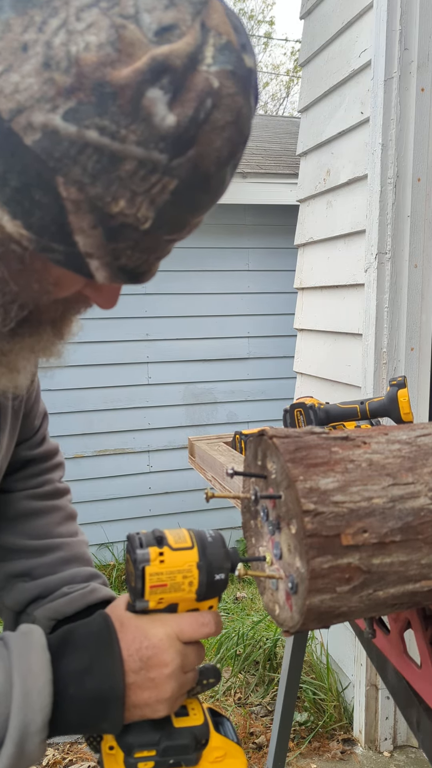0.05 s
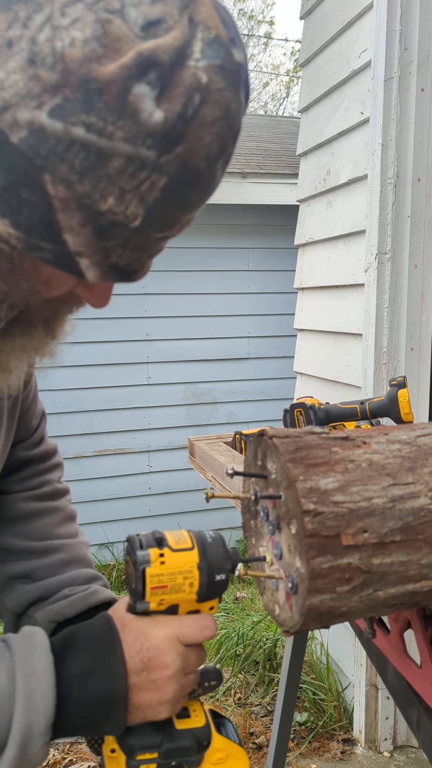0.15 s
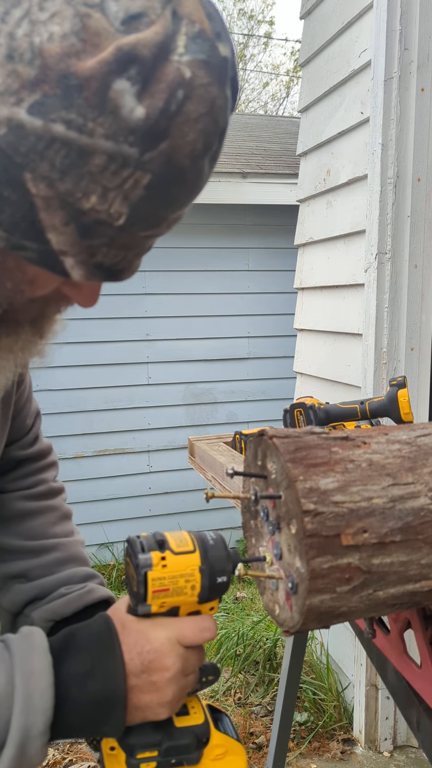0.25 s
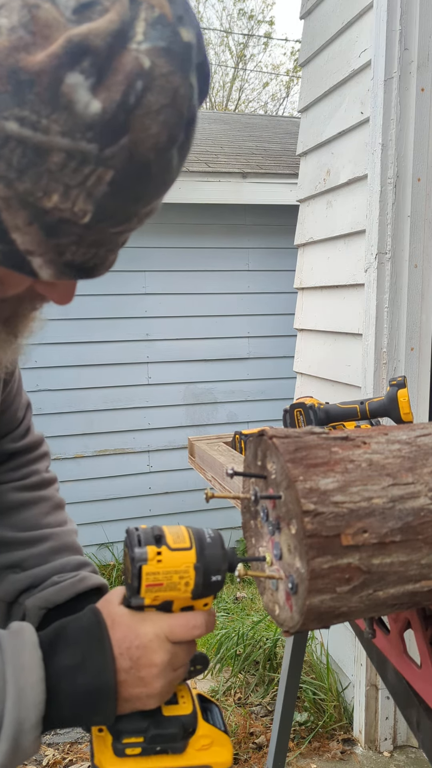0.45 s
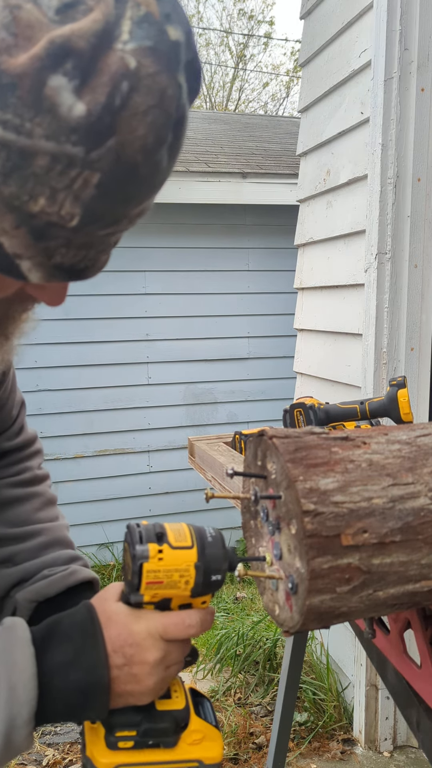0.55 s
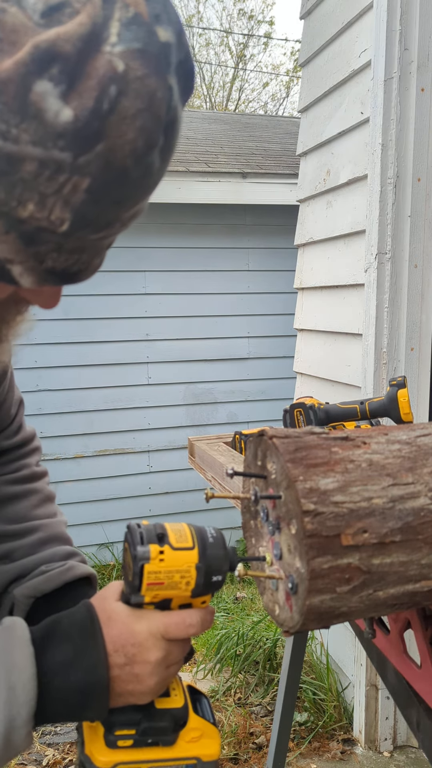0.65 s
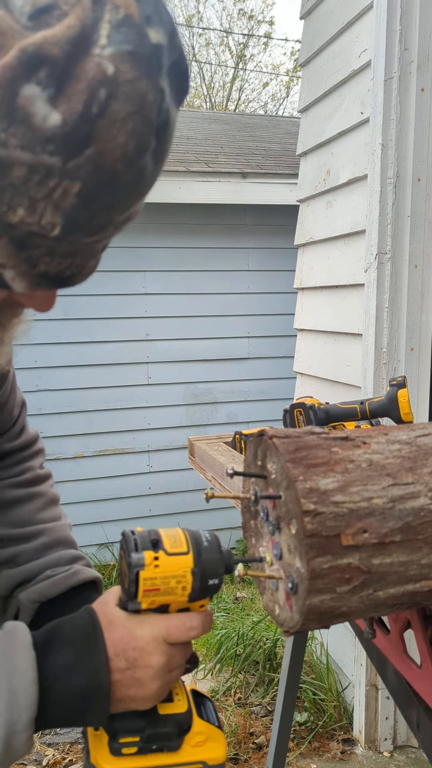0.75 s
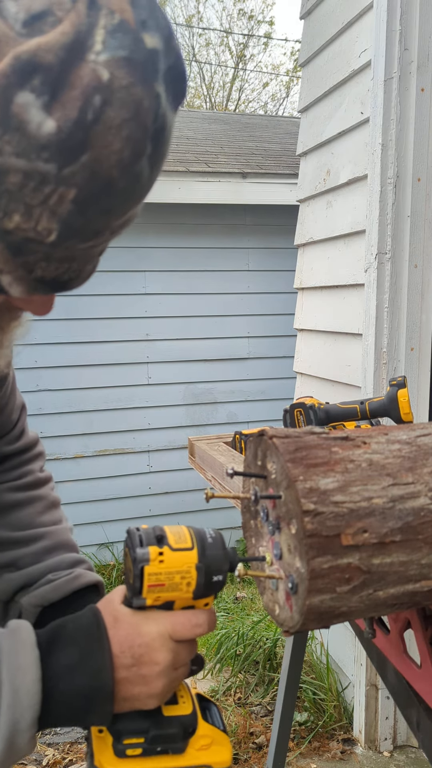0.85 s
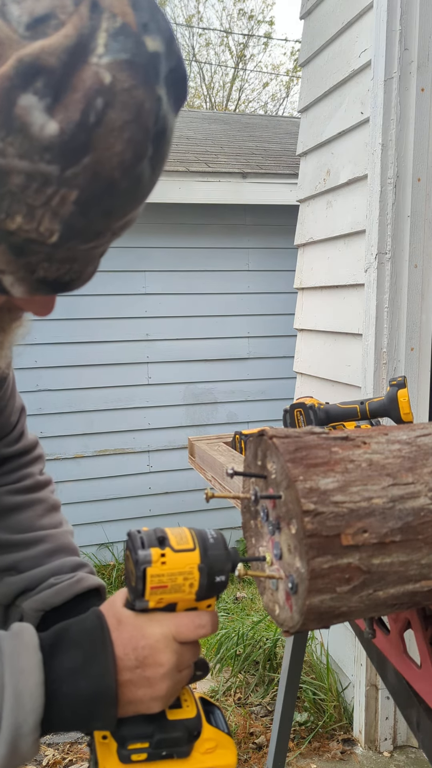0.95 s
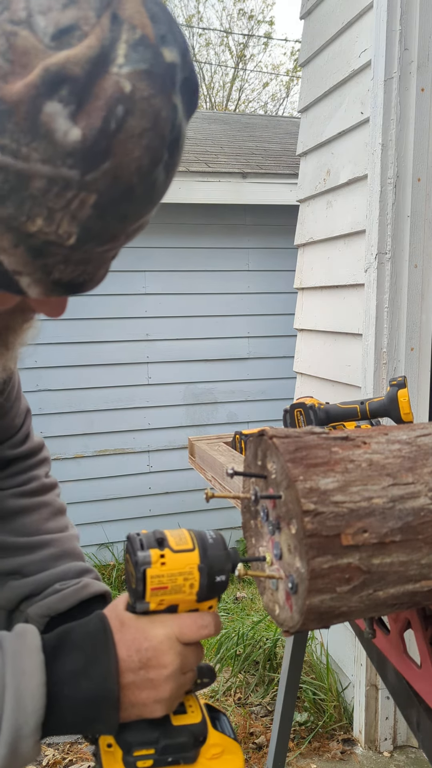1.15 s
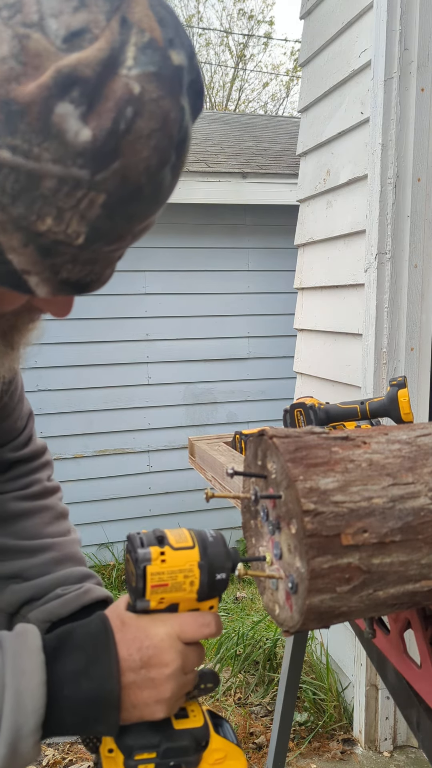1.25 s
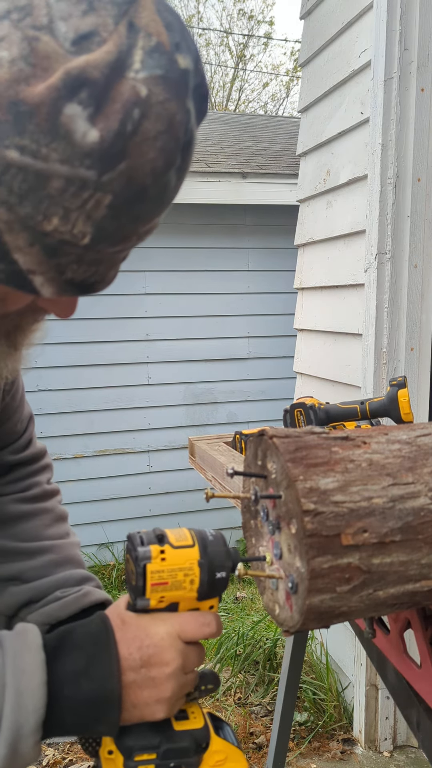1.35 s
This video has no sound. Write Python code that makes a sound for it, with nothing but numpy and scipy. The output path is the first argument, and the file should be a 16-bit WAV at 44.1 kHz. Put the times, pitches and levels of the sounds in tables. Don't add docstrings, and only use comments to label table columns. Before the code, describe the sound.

A cordless impact driver gives one short hammering burst on a screw in a log outdoors

```python
import sys
import numpy as np
from scipy import signal
from scipy.io import wavfile
from scipy.ndimage import uniform_filter1d

SR = 44100
rng = np.random.default_rng(int(sys.argv[2]) if len(sys.argv) > 2 else 0)


def boost(x):
    u = np.asarray(x, float) / 20
    return 10 ** u


def waveform_to_disk(signal):
    frames = np.transpose(np.atleast_2d(signal))
    scaled = np.clip(frames, -1, 1) * 32767
    samples = np.round(scaled).astype(np.int16)
    wavfile.write(sys.argv[1], SR, samples)


N = 61739

# t/s, peak level/dB, delay of the anvil crack/ms, crack against the ring/dB, chime level/dB
BLOWS = [(0.2374, -9, 3.23, 0.5, 2.5), (.2540, -10, 2.83, -1.5, -5), (0.2686, -8.5, 2.48, -4.5, 1),
         (0.2822, -7.5, 4.37, -5.5, -4), (0.2956, -10.5, 3.02, 4, 4.5), (0.3075, -13.5, 2.52, 1, 2.5),
         (0.3205, -10.5, 2.29, -1, -3.5), (.3324, -13.5, 2.37, -2.5, 4.5), (0.3434, -15.5, 2.67, 0, 1.5),
         (0.3564, -13, 2.3, -2.95, 2), (.3684, -13, 2.6, -2.5, 1), (0.3799, -12.5, 2.06, 1, -1),
         (0.392, -11, 2.01, 0.5, 3.5), (0.4032, -13, .7, 3.5, -4.5), (0.4173, -10.5, 2.5, -2.5, -3.5),
         (0.4384, -5, 0.93, 0.83, -3.5)]
# t/s, level/dB
THUMPS = [(.2364, -2), (.2536, 0.5), (.2672, 2), (0.2803, 0.5), (0.2947, -1.5), (0.3063, 0.5),
          (0.319, -0.5), (0.3309, -1), (.3428, -1.5), (.3549, -0.5), (0.3666, -0.5), (0.3785, 0),
          (0.3904, -0.5), (0.4024, -2.5), (0.4163, -0.5), (.438, -4)]
# t/s, peak level/dB, thud against it/dB, brightness/dB per octave, length/ms
KNOCKS = [(0.1406, -46, -29.5, 29, 23), (.175, -34.5, -24.5, -3, 11.5), (0.733, -49, -29.5, -10, 14.6),
          (.769, -49, -30, 6, 16), (.788, -47.5, -28.5, -5, 13.6), (0.8868, -33, -9.5, -1, 35.6),
          (0.9034, -31, -20.5, 8.5, 16.6), (0.9079, -29, -16, 22, 10.5), (0.9126, -32.5, -25, -0.5, 7.2),
          (0.914, -36, -35, 7.5, 15), (.923, -35.5, -38, 11, 9.6), (0.9319, -32, -23, -3.5, 13.1),
          (0.997, -63.5, 2.5, -2, 11), (1.2245, -44.5, -31.5, -6, 33), (1.2284, -29, -25, -4, 9.9),
          (1.26, -51, -11.5, -16.5, 13), (1.341, -46, -46.5, 2, 22.3), (1.352, -46, -39, -4, 15.4)]
# t/s, peak level/dB
TRIGGER = [
    (0.2074, -9),
    (0.5049, -5),
]
# t/s, level/dB
MOTOR_EFFORT = [
    (.2, -67.5),
    (.205, -45.5),
    (.212, -32.5),
    (.222, -30),
    (.236, -31),
    (.26, -23),
    (.42, -24.5),
    (.45, -33),
    (.49, -43),
    (.53, -77.5),
]
# f/Hz, level/dB, t60/s
BODY = [(1570, -22, 0.019), (1806, -1, 0.027), (1948.4, -6, .025), (2231.4, -7, 0.058), (2415, -4.5, .03),
        (2642, -3, .04), (2794, -6.5, .025), (2960, -15, 0.024), (3420, -6.5, 0.044), (4286, -14, 0.045),
        (5166, -13, 0.014), (6365, -4.5, 0.028)]
# f/Hz, density/dB per Hz
CRACK = [(300, -14.5), (1000, -11), (2200, -0.77), (4000, -11), (6200, -8.5), (8000, -20), (10300, -6.5),
         (12500, -24.5)]
# f/Hz, level/dB
LEAN = [(200, 2), (700, -1.5), (2000, -2), (5000, -9), (9000, -7.5), (14000, 0.78)]
# f/Hz, delay/samples
LAG = [(200, 2.5), (600, 14.0), (1120, 8.9), (1900, 3.3), (2600, 5.4), (6600, 2.7), (8000, 5.8)]

EDGES = 30 * 2 ** np.arange(0, 9.1, 1 / 3)
CENTRES = np.sqrt(EDGES[1:] * EDGES[:-1])


def in_time(rows):
    return np.interp(np.arange(N) / SR, *np.transpose(rows))


def at_hz(points, hz):
    return np.interp(np.log(hz), np.log(np.array(points)[:, 0]), np.array(points)[:, 1])


def tilted(spectrum, tilt_db):
    return [(hz, db + tilt_db * np.log2(hz / 2500)) for hz, db in spectrum]


def filtered(x, order, hz, kind):
    return signal.sosfilt(signal.butter(order, hz, kind, fs=SR, output="sos"), x)


def clicks(s, gain):
    out = np.full(N, 1e-18)
    np.add.at(out, (np.asarray(s) * SR).astype(int), gain)
    return out


def dying(x, t60, rise):
    fall_pole = boost(-60 / (t60 * SR))
    rise_pole = np.exp(-1 / (max(rise, 1e-5) * SR))
    falling = signal.lfilter([1], [1, -fall_pole], x)
    return signal.lfilter([1 - rise_pole], [1, -rise_pole], falling)


def ring(x, hz, t60):
    r, w = boost(-60 / (t60 * SR)), 2 * np.pi * hz / SR
    return signal.lfilter([0, np.sin(w)], [1, -2 * r * np.cos(w), r * r], x)


def bands(lean=1):
    # f/Hz, likeness/0-1
    likeness = [(100, 0.8), (700, 0.9), (2000, 0), (5000, 0.1), (12000, 0)]
    white, out = rng.standard_normal((2, 2, N)), []
    for k, hz in enumerate(CENTRES):
        mid, side = filtered(white[k % 2], 2, EDGES[k:k + 2], "band")
        alike = np.clip(at_hz(likeness, hz), 0, 1)
        pair = np.sqrt(1 + alike) * mid + np.sqrt(1 - alike) * side * [[1], [-1]]
        pair[0] = np.roll(pair[0], int(lean * at_hz(LAG, hz)))
        out.append(pair * boost(lean * at_hz(LEAN, hz) * np.array([[.5], [-.5]])))
    return np.array(out)


def colour(noise, spectrum):
    x = np.tensordot(boost(at_hz(spectrum, CENTRES)), noise, 1)
    return x / x.std()


def even(x):
    swell = np.sqrt(uniform_filter1d((x ** 2).mean(axis=0), size=40))
    return x / (swell + 0.18)


def struck(modes, s, db, spread_db, soft_hz):
    out = np.zeros((2, N))
    luck = rng.standard_normal((len(s), len(modes), 3))
    for k, (hz, level_db, t60) in enumerate(modes):
        jitter_s = 0.00013 * luck[:, k, 2] * (hz > 700)
        for c in range(2):
            at = s + jitter_s + (1 - c) * at_hz(LAG, hz) / SR
            chance_db = spread_db * (luck[:, k, 0] + .5 * c * luck[:, k, 1])
            size_db = db + level_db + chance_db + at_hz(LEAN, hz) * (.5 - c)
            out[c] += (-1) ** k * ring(clicks(at, boost(size_db)), hz, t60)
    return filtered(out, 2, [modes[0][0] * 0.48, soft_hz], "band")


def outdoor_floor():
    # f/Hz, density/dB per Hz
    floor_colour = [(28, -26.5), (62, 3), (100, -14.5), (135, -5.5), (220, -19.5), (900, -13), (5000, -20),
                    (16000, -33)]
    # t/s, level/dB
    breeze = [
        (0, -66),
        (.15, -67),
        (.7, -65.5),
        (1.1, -68),
        (1.4, -67.5),
    ]
    return boost(in_time(breeze)) * colour(bands(lean=0), floor_colour)


def stand():
    hz, t60 = 144.6, .11
    s = np.transpose(THUMPS)[0]
    hum = ring(ring(clicks(s, 0.894), hz, t60), hz, t60)
    return boost(-17.5) * hum / (t60 * SR)


def whine():
    s, db = np.transpose([row[:2] for row in BLOWS + TRIGGER + KNOCKS])
    db[len(BLOWS):] -= 4.0
    load_start_s = .25
    load_db = np.clip((np.arange(N) / SR - load_start_s) * 600.0, -14.0, 0)
    shaken = dying(clicks(s, boost(db - 25)), .018, .0008)
    level = shaken + boost(in_time(MOTOR_EFFORT) - 8.5 + load_db)
    narrow = signal.cheby1(6, 1, [14950, 16040], "band", fs=SR, output="sos")
    mid, side = signal.sosfilt(narrow, rng.standard_normal((2, N)))
    return level * np.array([side + .75 * mid, .75 * mid - side]) / mid.std()


def motor(noise):
    uneven = uniform_filter1d(rng.standard_normal(N), size=30) * np.sqrt(30)
    grit = boost(3.8 * uneven)
    return boost(in_time(MOTOR_EFFORT)) * grit * colour(noise, tilted(CRACK, 0.76))


def pings():
    # t/s, level/dB, f/Hz, t60/s
    parts = [(.2081, -12.5, 1952, 0.013), (.2081, -19, 6700, 0.0065), (.2078, -29, 885, 0.038),
             (.4388, -11.5, 2100, 0.0098), (0.36, -14.5, 5600, .006), (0.5033, -2.5, 2700, 0.0071),
             (.5058, -7.5, 2066, 0.0061), (.5056, -17.5, 1500, 0.0106), (.5056, -11.5, 7200, 0.0053),
             (.5056, -13.5, 4820, 0.00483), (1.3418, -46, 3400, .015), (1.342, -53, 4080, 0.0124),
             (1.3534, -53.5, 3670, 0.0111), (0.925, -35, 3400, 0.0101), (.8865, -39, 6200, .012),
             (0.896, -38, 10000, .012), (0.8874, -52.5, 620, 0.0255), (0.884, -35.5, 5450, .012),
             (0.915, -39.5, 9500, 0.0104), (0.927, -33.5, 5000, .01), (0.943, -30.5, 2624, 0.0099),
             (0.923, -38.5, 2130, 0.0164), (.9318, -48, 10200, 0.0093), (1.2278, -42.5, 502, 0.0603),
             (1.2286, -50, 400, 0.1414), (1.229, -48, 2024, 0.0517)]
    return sum(struck([(hz, db, t60)], np.array([s]), 0, 0, min(2 * hz, 16000)) for s, db, hz, t60 in parts)


def knock_crack(noise, s, db, tilt_db, length_ms):
    sloping = tilt_db * (CENTRES - 2500) < 0
    shape_db = at_hz(CRACK, CENTRES) - abs(tilt_db * np.log2(CENTRES / 2500)) * sloping
    start = int(s * SR)
    burst = np.tensordot(boost(shape_db), noise[:, :, start:start + SR // 4], 1)
    t = np.arange(burst.shape[1]) / SR
    fall = boost(-3 - 60000 * t / length_ms)
    out = np.zeros((2, N))
    out[:, start:start + len(t)] = even(burst / burst.std()) * boost(db) * fall * np.minimum(t / 0.00051, 1)
    return out


def knocks(noise):
    # f/Hz, level/dB, t60/s
    casing = [(238, -10, 0.048), (384.5, -6.5, 0.084), (460, -18, 0.042), (518.74, -3, 0.2),
              (740, 6, 0.041)]
    s, db, thud_db, tilt_db, length_ms = np.transpose(KNOCKS)
    out = struck(BODY, s, db - 18.5, 1.8, 7000.0)
    out += struck(casing, s, db + thud_db - 5.5, 2.4, 2100.0)
    hollow = np.tensordot(np.exp(-(np.log(CENTRES / 400) / .5) ** 2), noise, 1)
    out += dying(clicks(s, boost(db + thud_db - 10)), 0.13, 0.00071) * hollow / hollow.std()
    out += dying(clicks(s, boost(db - 23.5)), 0.16, .002) * colour(noise, tilted(CRACK, -3.0))
    for k in range(len(s)):
        out += knock_crack(noise, s[k], db[k], tilt_db[k], length_ms[k])
    return out


def trigger(noise):
    # f/Hz, level/dB, t60/s
    snap_modes = [(1374, -6.5, .009), (2003, -4, 0.012), (2360, 8.5, 0.012), (2859.5, -0.5, 0.032),
                  (3363, -7, 0.015), (4208, 0.5, 0.0064), (5370, -13, 0.0055), (6366, 5.5, 0.006)]
    # f/Hz, level/dB, t60/s
    after_modes = [(345.3, -8, 0.23), (497, -3, .1), (925, -5, 0.095), (1775.7, -6, 0.24),
                   (1958, -4.5, .13), (2110, -8.5, .18), (2565, -1, .15), (2690, -1, 0.23),
                   (3408, -8.5, 0.16), (4250, -3, .06)]
    s, db = np.transpose(TRIGGER)
    spit = dying(clicks(s, boost(db - 5.5)), 0.0092, 0.00079) * even(colour(noise, CRACK))
    snap = struck(snap_modes, s + 0.00054, db - 26, 1.5, 9000.0) + spit
    snap = filtered(snap, 4, 970, "high")
    echo = dying(clicks(s, boost(db - 31)), 0.2, .005) * colour(noise, tilted(CRACK, -3.5))
    after_db = db - 29.5 + [-11.0, 0]
    return snap + echo + struck(after_modes, s + .001, after_db, 0.91, 6600.0)


def log_thump():
    # f/Hz, level/dB, t60/s
    log_modes = [(278.4, -1, 0.074), (343, -10.5, 0.4), (334.8, 1.5, 0.055), (429.8, 2.5, 0.032),
                 (508.4, -5.5, 0.11), (854.5, -13.5, 0.065), (1246, -7, .04)]
    # f/Hz, t60/s, level/dB, fading/dB per s
    shank = (925, 0.0389, -25.5, -40.5)
    s, db = np.transpose(THUMPS)
    hz, t60, shank_db, fade_db = shank
    thump = struck(log_modes, s, db - 30, 0.35, 2800.0)
    return thump + struck([(hz, shank_db, t60)], s + .004, fade_db * (s - s[0]), 1.8, 3600.0)


def anvil():
    # f/Hz, level/dB, t60/s
    anvil_modes = [(4870, -5.5, .008), (5500, -7.5, .008), (6300, -4.5, 0.011)]
    # f/Hz, level/dB, t60/s
    chime_modes = [(9130, -5.5, 0.014), (10150, 1, 0.018), (10700, -3, 0.0064), (11500, -6, 0.0089)]
    s, db, delay_ms, crack_db, chime_db = np.transpose(BLOWS)
    late, level_db = s + delay_ms / 1000, db.mean() - 7
    landing = struck(anvil_modes, late, level_db + crack_db, 1.5, 16000.0)
    return landing + struck(chime_modes, late, level_db + chime_db, 1.5, 16000.0)


def pulse_noise(noise):
    s, db, delay_ms, crack_db, _ = np.transpose(BLOWS)
    crack = dying(clicks(s + delay_ms / 1000, boost(db.mean() + crack_db + 2)), .011, .0004)
    rattle = dying(clicks(s, boost(db - 11)), 0.032, 0.0011)
    echo = dying(clicks(s, boost(db - 21.5)), 0.2444, .004)
    direct = np.hypot(crack, rattle) * even(colour(noise, tilted(CRACK, 2.5)))
    wash = echo * colour(noise[:, :, ::-1], tilted(CRACK, -1.5))
    return filtered(direct + wash, 4, 493.5, "high")


def hammer(noise):
    s, db = np.transpose(BLOWS)[:2]
    body = struck(BODY, s, db - 8.5, 1.5, 18000.0)
    return log_thump() + body + anvil() + pulse_noise(noise)


def scene():
    one, two = bands(), bands()
    two_reversed = two[:, :, ::-1]
    echo_end_s = 0.6372
    fade = np.clip((echo_end_s - np.arange(N) / SR) / 0.018, .04, 1)
    tool = (hammer(one) + trigger(two_reversed)) * fade
    tool += motor(two) + knocks(two_reversed) + pings()
    tool = filtered(tool, 6, 10490, "low") + whine()
    tool = filtered(tool, 10, 205, "high") + stand()
    return tool + outdoor_floor()


def roll_off(x):
    return signal.sosfilt(signal.butter(12, 16970, fs=SR, output="sos"), x)


def record(dry):
    limit = 0.912
    rounded = limit * np.tanh(dry / limit)
    x = signal.sosfilt(signal.cheby2(12, 70, 16800, fs=SR, output="sos"), rounded)
    gap = signal.cheby2(2, 12, [12720, 14100], "bandstop", fs=SR, output="sos")
    return roll_off(signal.sosfilt(gap, x))


dry = scene()
out = record(dry)
waveform_to_disk(out)
```